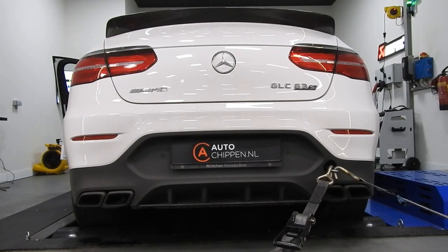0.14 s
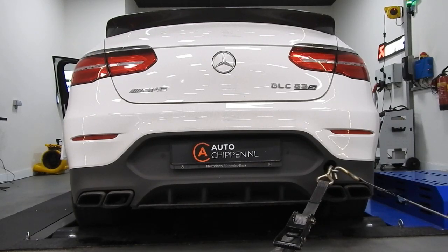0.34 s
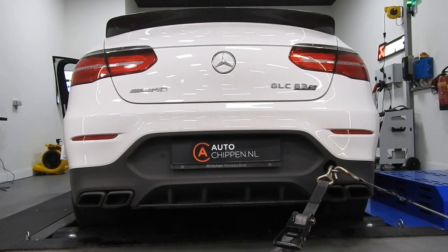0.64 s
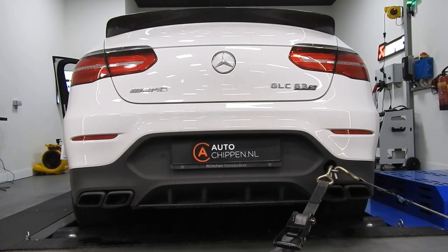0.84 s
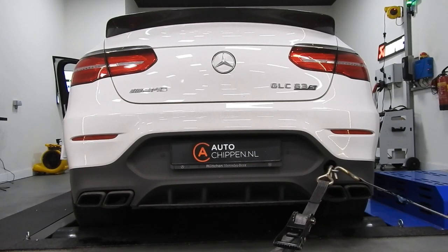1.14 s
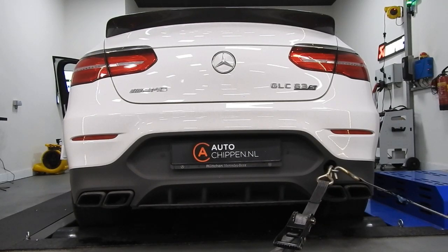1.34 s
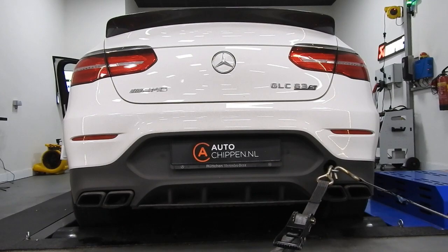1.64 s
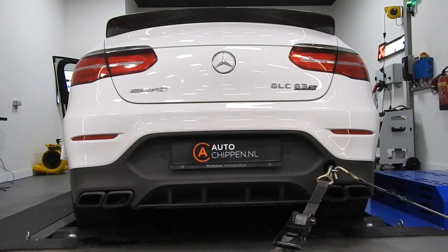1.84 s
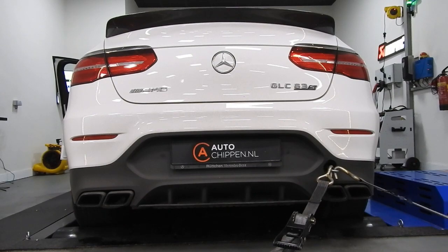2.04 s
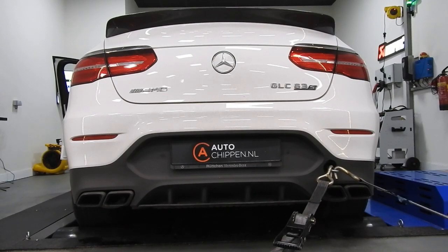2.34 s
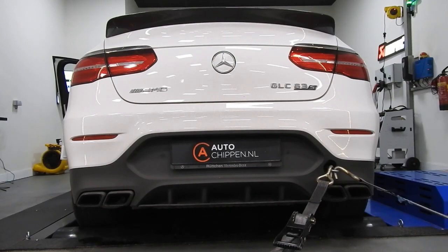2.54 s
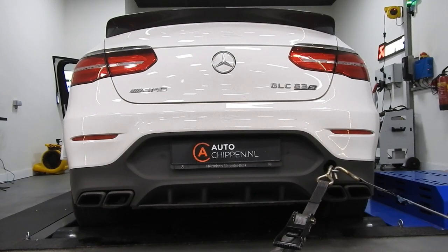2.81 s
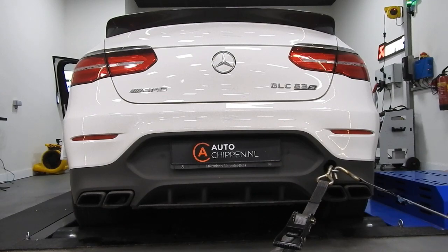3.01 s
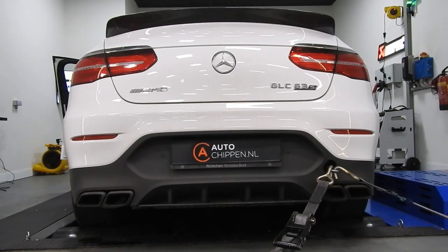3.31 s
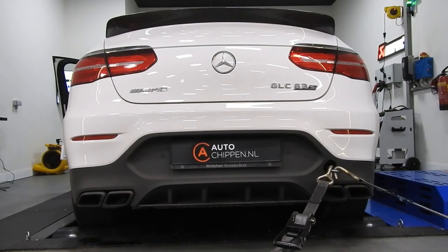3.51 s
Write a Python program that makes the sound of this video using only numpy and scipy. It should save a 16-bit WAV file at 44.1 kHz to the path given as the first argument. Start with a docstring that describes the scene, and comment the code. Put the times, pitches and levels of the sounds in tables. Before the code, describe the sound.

Three quick revs of a powerful car engine, each followed by burbling exhaust pops.

```python
"""Revving a V8 in a workshop

A turbocharged V8 gets three blips (quick presses of the throttle), heard from just behind its tailpipes.
Each firing sends a puff of gas down the pipes, and in a blip the puffs speed up into a rasping roar.
When the throttle shuts, fuel burns in the exhaust, which burbles, pops and crackles.
Then the engine sinks back towards a lumpy idle while the rush of gas dies away."""
import sys
import numpy as np
from scipy import signal
from scipy.fft import rfft, irfft, next_fast_len
from scipy.io import wavfile

SR = 44100
rng = np.random.default_rng(int(sys.argv[2]) if len(sys.argv) > 2 else 0)


def unload_audio(sound):
    """Save the sound as a 16-bit wav file, at the path given as the first command line argument."""
    columns = np.transpose(np.atleast_2d(sound))
    # keep every value between -1 and 1, then stretch to whole-number steps
    steps = np.round(np.clip(columns, -1, 1) * 32767)
    wavfile.write(sys.argv[1], SR, steps.astype(np.int16))


N = 161406
TIME = np.arange(N) / SR


def from_db(db):
    """Turn decibels into a number to multiply by."""
    return 10 ** (np.asarray(db) / 20)


def rms_one(x):
    """Scale a signal to an average (RMS) level of 1."""
    return x / np.sqrt(np.mean(x ** 2) + 1e-20)


def in_time(rows):
    """Join (seconds, value) points with straight lines."""
    return np.interp(TIME, *np.transpose(rows))


def gate(start, end, rise_s, decay_s):
    """A level that rises from start, holds until end, then dies away."""
    return np.clip((TIME - start) / rise_s, 0, 1) * np.exp(-np.maximum(TIME - end, 0) / decay_s)


def drift(rate_hz):
    """A smooth random wobble, about 1 in size."""
    r = np.exp(-80 * np.pi * rate_hz / SR)
    slow = signal.lfilter([1], [1, -2 * r, r * r], rng.standard_normal(N // 40 + 2002))[2000:]
    return np.interp(np.arange(N) / 40, np.arange(len(slow)), rms_one(slow))


def colour(x, points):
    """Make some frequencies louder and others softer, following (Hz, dB) points."""
    size = 2 * next_fast_len(N // 2 + SR // 10, True)
    hz, db = np.transpose(points)
    grid = np.maximum(np.arange(size // 2 + 1) * SR / size, 1)
    cepstrum = irfft(np.log(from_db(np.interp(np.log(grid), np.log(hz), db))))
    # make the filter ring only after a sound, never before
    cepstrum[1:size // 2] *= 2
    cepstrum[size // 2 + 1:] = 0
    return irfft(rfft(x, size) * np.exp(rfft(cepstrum)))[:N]


# Engine speed. Each row: time in seconds, firings per second.
FIRING_RATE = [(0, 82), (.16, 79), (.25, 73), (.3, 90), (.38, 115), (.44, 146), (.49, 185), (.6, 252),
               (.65, 272), (.9, 212), (1.2, 166), (1.44, 140), (1.68, 121), (1.8, 107), (1.83, 127),
               (1.88, 165), (1.97, 230), (2.04, 262), (2.45, 175), (2.72, 144), (2.99, 123), (3.125, 111),
               (3.2, 163), (3.29, 230), (3.34, 259), (3.39, 272), (3.66, 212)]

def engine_speed(reference_hz=149.3):
    """Give a running count of firings, and the speed in octaves (doublings) above the reference."""
    hz = in_time(FIRING_RATE)
    firings = np.cumsum(hz * (1 + .006 * drift(15))) / SR
    return firings, np.log2(hz / reference_hz)


# Throttle presses; the first two make one blip.
# Each row: opening and shutting times in seconds, load in dB, relative rasp level in dB.
BLIPS = [(0.26, 0.331, -9, 5.5), (0.375, 0.594, -3.5, -2), (1.809, 2.006, -5.5, 0), (3.127, 3.344, -4, 0)]
OPEN_S, SHUT_S = 0.0068, 0.063

def engine_load():
    """How hard the engine works as the throttle opens and shuts."""
    return sum(from_db(db) * gate(start, end, OPEN_S, SHUT_S) for start, end, db, _ in BLIPS)


# Notes the pipes ring at. Each row: pitch in Hz, width in Hz, level in dB.
PIPE_RINGS = [(288, 24, 0), (356, 22, 6)]

def tailpipe(x):
    """Add the ring of the pipes to a sound passing through them."""
    out = x
    for hz, width_hz, db in PIPE_RINGS:
        r = np.exp(-np.pi * width_hz / SR)
        ring = signal.lfilter([1, 0, -1], [1, -2 * r * np.cos(2 * np.pi * hz / SR), r * r], x)
        out = out + from_db(db) * (1 - r * r) / 2 * ring
    return out


# Exhaust tones. Each row: waves per cycle of eight firings, relative dB under load and when coasting.
TONES = [(4, -26, -33), (5, -31, -38), (6, -11.5, -31), (7, -23, -35), (8, -17.5, -22.7), (9, -26, -33),
         (10, -19, -31), (12, -27, -39), (14, -24, -48), (16, -27, -41)]

def roar(firings, load):
    """Low exhaust tones, strongest under load, drop out while the engine misfires after a blip."""
    misfiring = sum(gate(start, end, OPEN_S, decay_s=0.11) for start, end, _ in OVERRUNS)
    coasting = np.maximum(1 - load - misfiring, 0)
    out = 0
    for multiple, load_db, coast_db in TONES:
        level = load * from_db(load_db + 2.5) + coasting * from_db(coast_db + .5)
        turns = round(multiple) * firings / len(CYLINDERS) + rng.random()
        waver = 1 + .28 * drift(15)
        out = out + np.sqrt(2) * level * waver * np.sin(2 * np.pi * turns)
    return out


# Each entry: the strength of one cylinder's puff in dB, in firing order.
CYLINDERS = [-0.5, -2.5, -5, 3.5, -2.5, -1.5, -1.5, -0.5]

def puffs(firings, decay_s, uneven_db, thud):
    """Each firing makes a thud of pressure and a burst of swirling gas, of slightly random strength."""
    count = firings.astype(int)
    starts = np.flatnonzero(np.diff(count))
    chance_db = uneven_db * np.clip(rng.standard_normal(len(starts)), -2, 2)
    clicks = np.zeros(N)
    clicks[starts] = from_db(np.take(CYLINDERS, count[starts], mode="wrap") + chance_db)
    envelope = signal.lfilter([1], [1, -np.exp(-1 / (decay_s * SR))], clicks)
    return rms_one(envelope * rng.standard_normal(N)) + thud * rms_one(clicks)


# The deep tone of the chuffing. Each row: frequency in Hz, relative level in dB.
CHUFF_COLOUR = [(35, -79.5), (78, 12), (130, -6), (230, -1.5), (390, 1), (490, -11), (640, -3),
                (900, -16.5), (1250, -3.5), (1550, -5), (1850, -18.5), (3200, -21), (6000, -62)]

def chuff(firings, octaves):
    """Long, soft puffs go on throughout, louder as the engine slows."""
    gas = tailpipe(puffs(firings, decay_s=.011, uneven_db=1, thud=0.34))
    return from_db(-25.5 - 6 * octaves) * rms_one(colour(gas, CHUFF_COLOUR))


# How the rush of gas swells and fades. Each row: time in seconds, level in dB.
RUSH_LEVEL = [(0, -38), (.19, -44.5), (.24, -35), (.35, -32.5), (.5, -20.5), (.62, -19.5), (.78, -29),
              (.92, -27.5), (1.05, -24), (1.2, -29.5), (1.4, -37), (1.6, -40.5), (1.79, -43.5),
              (1.87, -28.5), (1.98, -21.5), (2.06, -20), (2.2, -20), (2.42, -23.5), (2.62, -33),
              (2.83, -39), (3.13, -41.5), (3.2, -27), (3.37, -16.5), (3.43, -17), (3.55, -19.5),
              (3.66, -22.5)]
# The tone of its hiss. Each row: frequency in Hz, relative level in dB.
RUSH_COLOUR = [(300, 0.5), (1000, 14.5), (2000, 15.5), (3300, 6.5), (5000, 6.5), (7000, 0.5), (9500, -1),
               (11500, -16.5), (15500, -43)]

def rush(firings):
    """Gas hisses out of the pipes, partly in time with the firings; the turbos whistle in it."""
    jet = rng.standard_normal(N) + 0.54 * puffs(firings, decay_s=0.0024, uneven_db=8, thud=0.15)
    hiss = rms_one(colour(jet, RUSH_COLOUR))
    return from_db(in_time(RUSH_LEVEL)) * (hiss + from_db(-19) * turbos())


# Knocks in the exhaust, mostly as it takes up load. Each row: start in seconds, level in dB.
KNOCKS = [(.069, -19), (.397, -17), (1.852, -10), (1.899, -9), (3.136, -13), (3.193, -11), (3.238, -15)]
# Notes in each knock. Each row: pitch in Hz, relative level in dB, fade time in seconds.
METAL_RINGS = [(356, -3, .03), (1330, -3, .006), (1520, 0, .007), (1720, -5, .006)]

def knocks(rise_s=.0025, detune=.025):
    """Soft knocks set the metal of the exhaust ringing, a little differently each time."""
    out = 0
    for start, db in KNOCKS:
        for hz, ring_db, decay_s in METAL_RINGS:
            turns = hz * (1 + detune * rng.standard_normal()) * (TIME - start) + rng.random()
            level = from_db(db + ring_db) * gate(start, start + rise_s, rise_s, decay_s)
            out = out + level * np.sin(2 * np.pi * turns)
    return out


# The tones of a bright crack and of a hollow bark in the pipes, shared by the tick and the pops.
# Each row: frequency in Hz, relative level in dB.
CRACK_COLOUR = [(300, -2.5), (1500, -9.5), (4500, 2), (7000, 0.5), (9800, -1), (12000, -16), (15500, -19.5)]
BARK_COLOUR = [(150, -31), (350, 3.5), (520, -12.5), (700, -1.5), (950, -9.5), (1250, -0.5), (1650, 1),
               (2000, -9.5), (3300, -12), (6000, -63)]

def tick(start_s=.197):
    """One dry tick with a small knock under it."""
    click = 1. * (np.arange(N) == int(start_s * SR))
    return from_db(-7) * colour(click, CRACK_COLOUR) + from_db(12) * colour(click, BARK_COLOUR)


# The hard tone of the rasp. Each row: frequency in Hz, relative level in dB.
RASP_COLOUR = [(150, -43), (300, -5), (400, 2.5), (520, -3.5), (680, -1.5), (930, -11), (1200, -1),
               (1650, -1), (1950, -10.5), (3300, -17), (6000, -35), (12000, -52)]

def rasp(firings, octaves, rise_s=.075):
    """Short, sharp puffs rasp while the throttle is open, louder as the engine speeds up."""
    level = sum(from_db(db) * gate(start, end, rise_s, SHUT_S) for start, end, _, db in BLIPS)
    gas = tailpipe(puffs(firings, decay_s=.002, uneven_db=1.5, thud=0.77))
    return level * from_db(-18.5 + 9 * octaves) * rms_one(colour(gas, RASP_COLOUR))


def intake(firings, octaves, load, pitch_hz=2250, spread_hz=600):
    """Air rasps through the open throttle, one gulp per firing, higher as the engine speeds up."""
    angle = 2 * np.pi * np.cumsum(pitch_hz * 2 ** (.5 * octaves)) / SR
    noise = signal.sosfilt(signal.butter(2, spread_hz, fs=SR, output="sos"), rng.standard_normal(N))
    strength = from_db(np.take(CYLINDERS, firings.astype(int), mode="wrap"))
    gulps = np.sin(np.pi * firings) ** 4 * strength
    return load * from_db(-23.5 - 1.5 * octaves) * rms_one(noise * np.sin(angle) * gulps)


def bursts(starts, levels_db, points, rise_s, decay_s, grain_db):
    """Sudden bursts of grainy noise that die away, coloured by (Hz, dB) points."""
    power = sum((from_db(db) * gate(start, start + rise_s, rise_s, decay_s)) ** 2
                for start, db in zip(starts, levels_db))
    grains = rng.standard_normal(N) * from_db(grain_db * drift(380))
    return colour(np.sqrt(power) * grains, points) / np.std(colour(grains, points))


# Exhaust pops. Each row: start in seconds, then the levels of the boom, bark and crack in dB.
POPS = [(.286, -3, -15.5, -41), (0.597, -25, -6.5, -36), (0.615, -10, -17, -20.5), (0.654, -1.5, -36, -31),
        (0.682, -11, -17, -34), (0.699, -23, -38, -19.5), (0.74, -7, -25, -42), (0.795, -12, -11.5, -31),
        (0.862, -8, -16, -25), (.937, -10, -9, -25), (0.96, -18, -15.5, -16.5), (1.046, -11, -10.5, -39),
        (1.069, -13, -42, -21), (1.987, -9, -15, -20), (2.025, -17, -21, -14), (2.05, -14, -30, -11),
        (2.088, -9, -12.5, -17), (2.157, -11, -21, -17), (2.229, -21, -8, -25), (2.243, -34, -25, -16),
        (2.377, -4.5, -6, -19.5), (3.338, -20, -16, -30), (3.387, -5, -14, -13), (3.41, -15, -22, -11),
        (3.502, -7, -20.5, -14.5), (3.549, -3, -10, -17)]

def pops(boom_hz=94, boom_rise_s=.006, barks_per_pop=3, stutter_s=.014, loss_db=6):
    """Fuel fires in the exhaust: a low boom, a sharp crack and a stutter of ever weaker barks."""
    starts, boom_db, bark_db, crack_db = np.transpose(POPS)
    boom = 0
    for start, db in zip(starts, boom_db):
        level = from_db(db) * gate(start, start + boom_rise_s, boom_rise_s, decay_s=.015)
        boom = boom + level * np.sin(2 * np.pi * boom_hz * (TIME - start))
    repeat = np.arange(barks_per_pop)
    delays = stutter_s * repeat * (1 + .5 * rng.random((len(starts), barks_per_pop)))
    bark_starts = (starts[:, None] + delays).ravel()
    fading_db = (bark_db[:, None] - loss_db * repeat).ravel()
    bark = bursts(bark_starts, fading_db, BARK_COLOUR, rise_s=.0025, decay_s=.008, grain_db=1)
    crack = bursts(starts, crack_db, CRACK_COLOUR, rise_s=1 / SR, decay_s=.016, grain_db=3.5)
    return boom + tailpipe(bark) + crack


# Overruns: spells after the throttle shuts, when fuel burns in the exhaust.
# Each row: start and end in seconds, relative level in dB.
OVERRUNS = [(0.648, 1.086, -0.5), (2.047, 2.49, 1), (3.374, 3.663, -0.5)]
# The low tone of the burble. Each row: frequency in Hz, relative level in dB.
BURBLE_COLOUR = [(25, -44), (55, -0.5), (88, -8), (125, 2.5), (170, 2.5), (250, -8), (410, -4.5),
                 (500, -8.5), (660, -4.5), (950, -16), (1200, -15), (1600, -11), (2000, -41), (4000, -26),
                 (12000, -61)]

def burble(firings, fade_db_per_s=12):
    """Fuel burning in the exhaust makes ragged puffs that fade away."""
    level = 0
    for start, end, db in OVERRUNS:
        fading_db = db - fade_db_per_s * np.maximum(TIME - start, 0)
        level = level + from_db(fading_db) * gate(start, end, OPEN_S, decay_s=0.23)
    gas = tailpipe(puffs(firings, decay_s=0.0039, uneven_db=3.5, thud=0.35))
    return level * from_db(-13.5) * rms_one(colour(gas, BURBLE_COLOUR))


def turbos(top_hz=11200, fall_hz_per_s=3200, width_hz=260, run_down_s=2.3):
    """The turbos run down after each blip with a breathy, falling whistle."""
    out = 0
    for start, _, _ in OVERRUNS:
        hz = top_hz - fall_hz_per_s * np.maximum(TIME - start, 0)
        angle = 2 * np.pi * np.cumsum(hz) / SR
        whistle = drift(width_hz) * np.sin(angle) + drift(width_hz) * np.cos(angle)
        out = out + rms_one(whistle) * gate(start, start + run_down_s, run_down_s / 2, SHUT_S)
    return out


def echoes(x, fade_s, first_s):
    """Bare walls throw back a blur of echoes that falls by 60 dB in fade_s."""
    t = TIME[:SR // 2]
    response = rng.standard_normal(len(t)) * from_db(-60 * t / fade_s) * (t > first_s)
    return signal.fftconvolve(x, response / np.linalg.norm(response))[:N]


# Stereo spread. Each row: frequency in Hz, gain of the side (left minus right) signal in dB.
STEREO_WIDTH = [(60, -46), (300, -17), (700, -10), (1500, -9.5), (2800, -3.5), (6000, -2), (11000, 4)]

def scene():
    """The engine in the workshop: bass a little to the left, treble spread wide."""
    firings, octaves = engine_speed()
    load = engine_load()
    exhaust = rasp(firings, octaves) + burble(firings) + chuff(firings, octaves)
    noises = exhaust + intake(firings, octaves, load) + knocks() + pops() + rush(firings) + tick()
    mid = tailpipe(roar(firings, load)) + noises
    mid = mid + from_db(-6) * echoes(noises, fade_s=0.54, first_s=0.0053)
    side_echoes = from_db(-3) * echoes(noises, fade_s=0.17, first_s=0.00065)
    side = colour(side_echoes + from_db(-5.5) * rush(firings), STEREO_WIDTH)
    bass = signal.sosfilt(signal.butter(1, 450, fs=SR, output="sos"), mid)
    side = side + (from_db(1.7) - 1) * bass
    return np.array([mid + side, mid - side])


LOW_CUT_HZ, HIGH_CUT_HZ, CEILING = 53, 16000, .95

def record(dry):
    """Take out the deepest bass, round off loud peaks and cut the highest treble."""
    dry = signal.sosfilt(signal.butter(2, LOW_CUT_HZ, "high", fs=SR, output="sos"), dry)
    rounded = dry / (1 + (dry / CEILING) ** 4) ** (1 / 4)
    return signal.sosfilt(signal.ellip(10, .2, 80, HIGH_CUT_HZ, fs=SR, output="sos"), rounded)


dry = scene()
out = record(dry)
unload_audio(out)
```